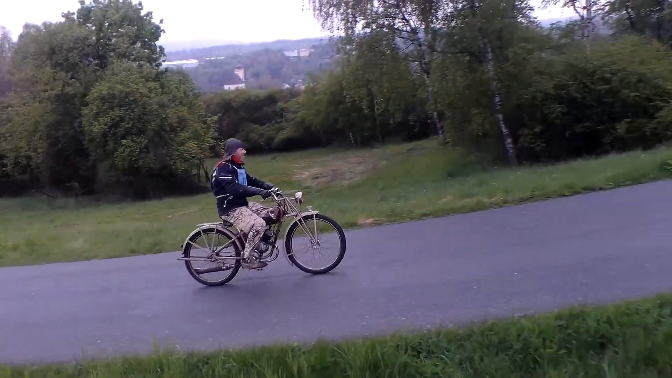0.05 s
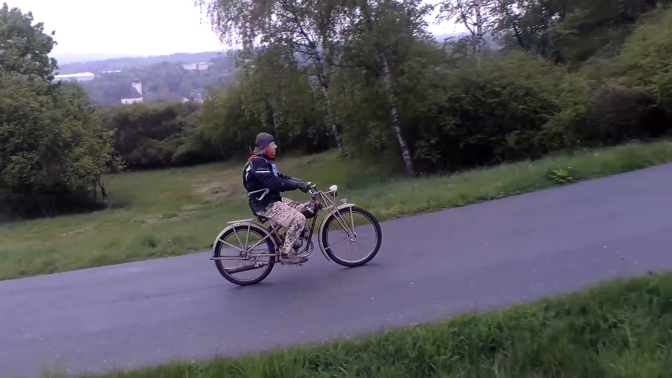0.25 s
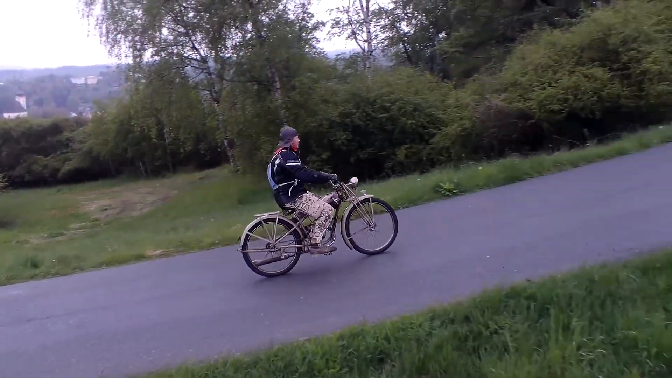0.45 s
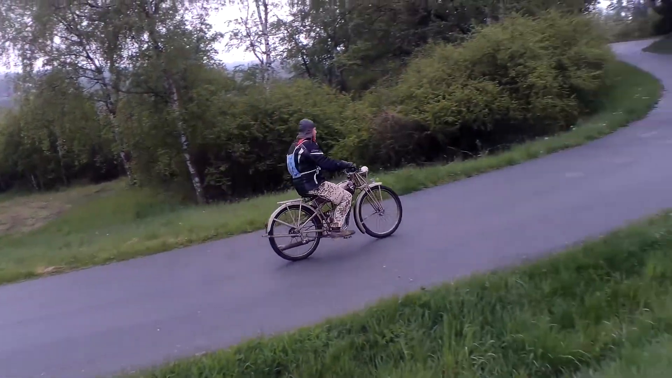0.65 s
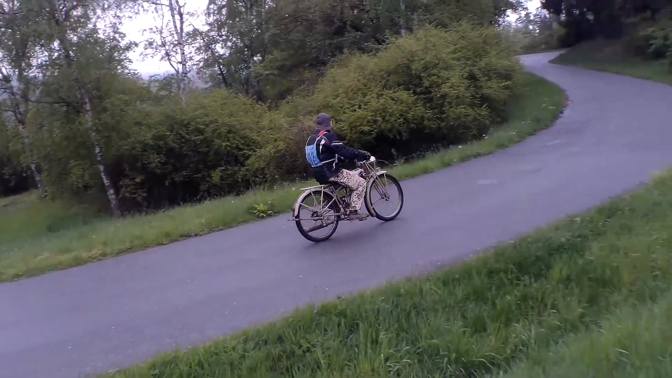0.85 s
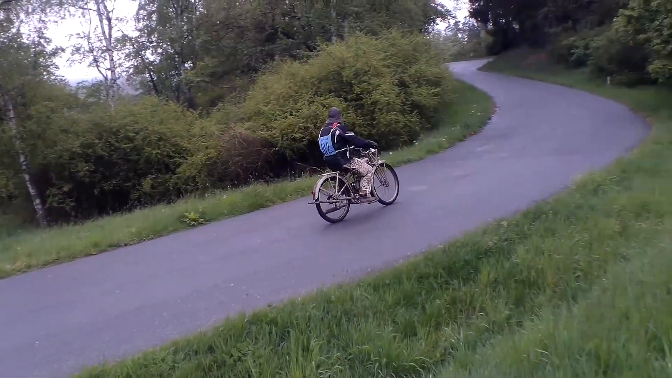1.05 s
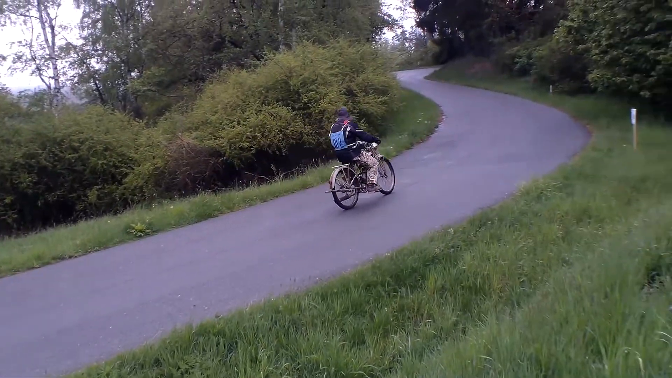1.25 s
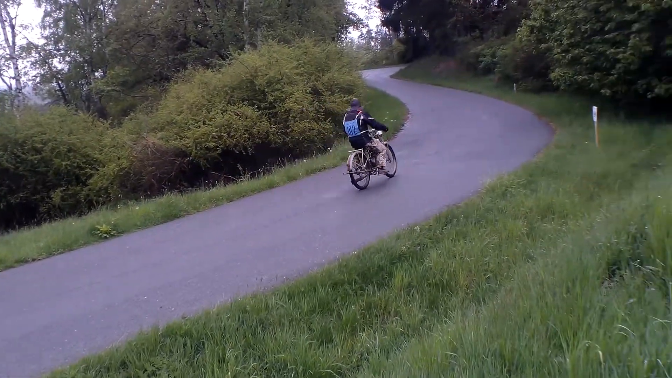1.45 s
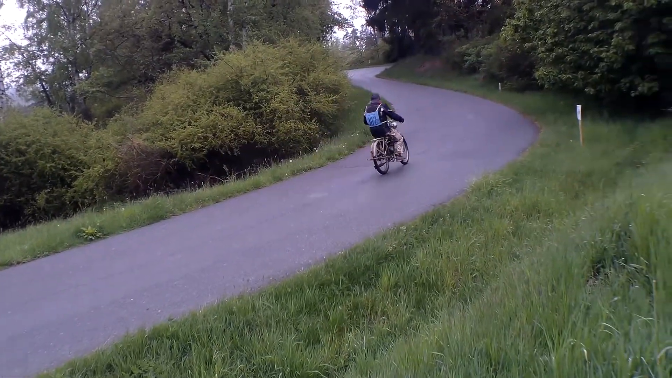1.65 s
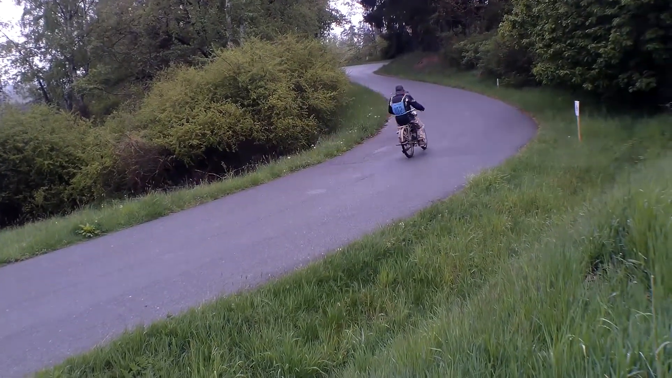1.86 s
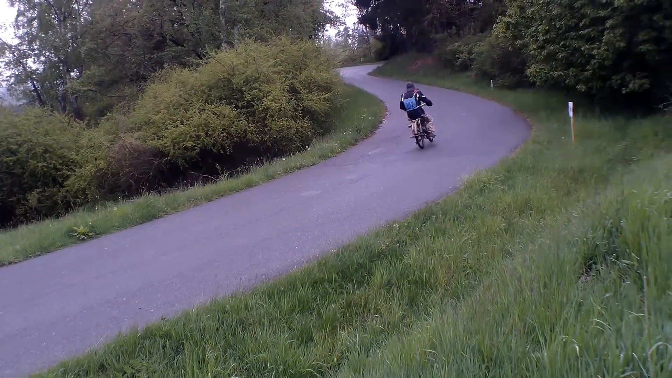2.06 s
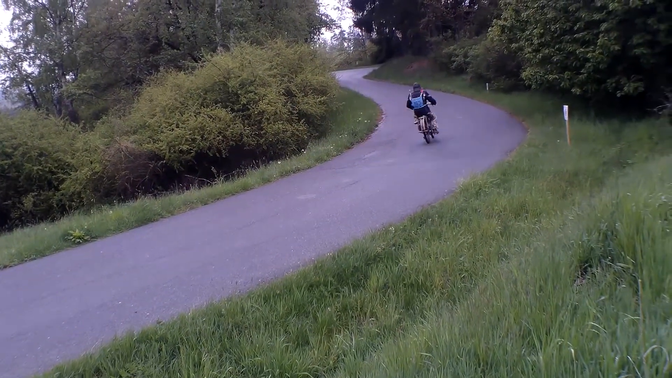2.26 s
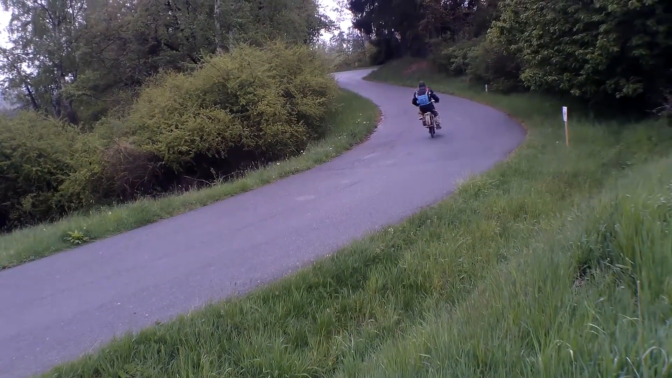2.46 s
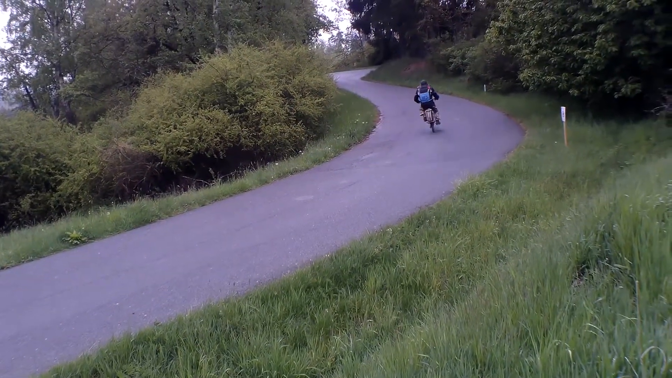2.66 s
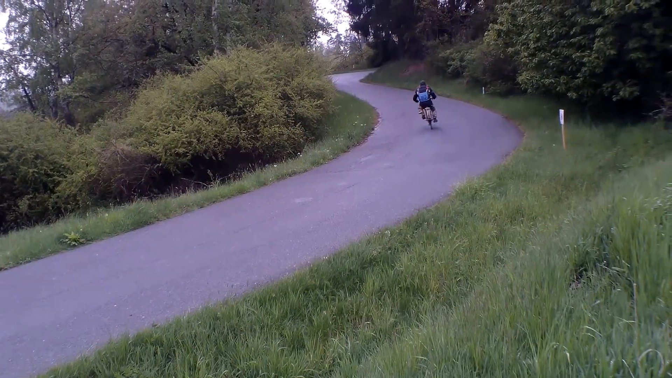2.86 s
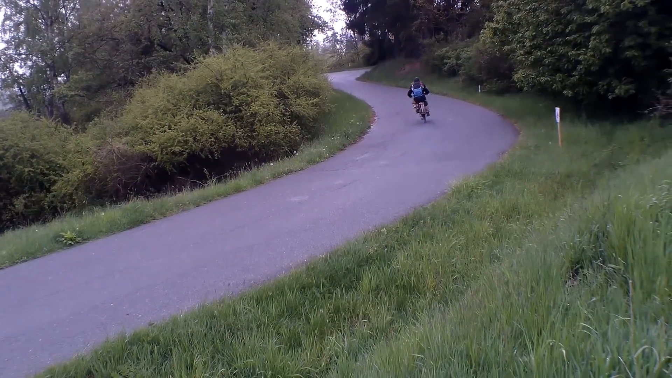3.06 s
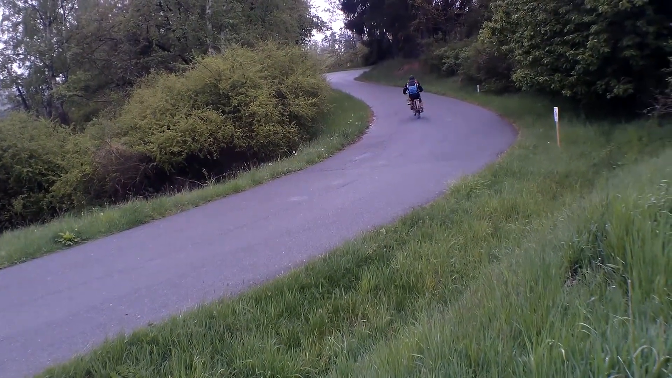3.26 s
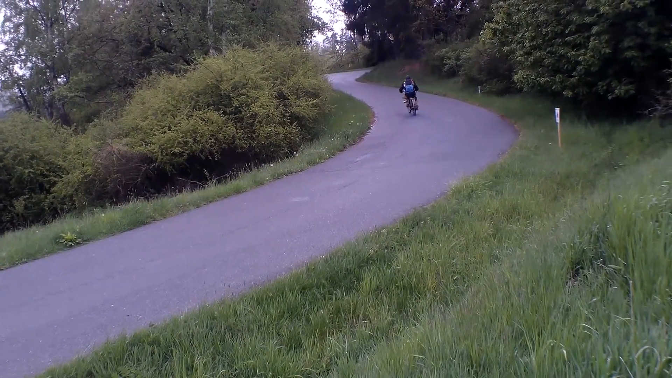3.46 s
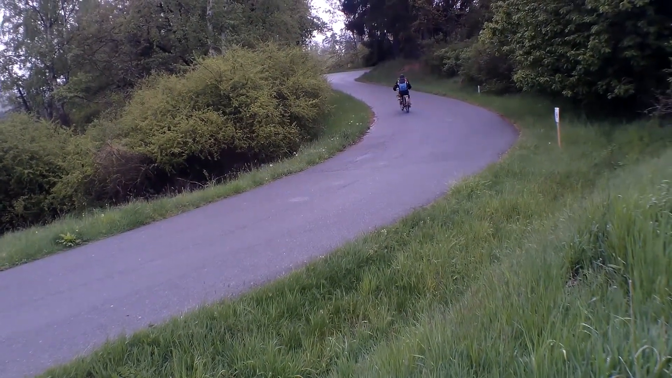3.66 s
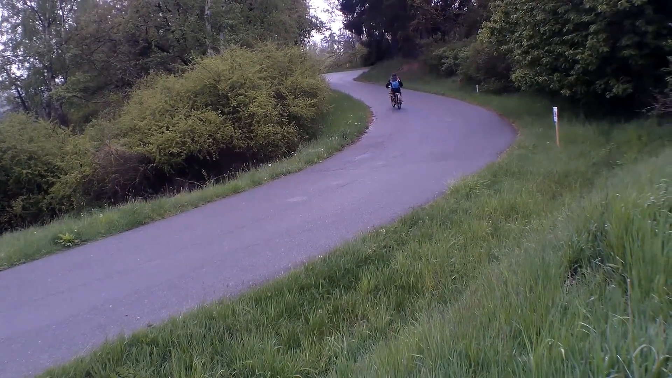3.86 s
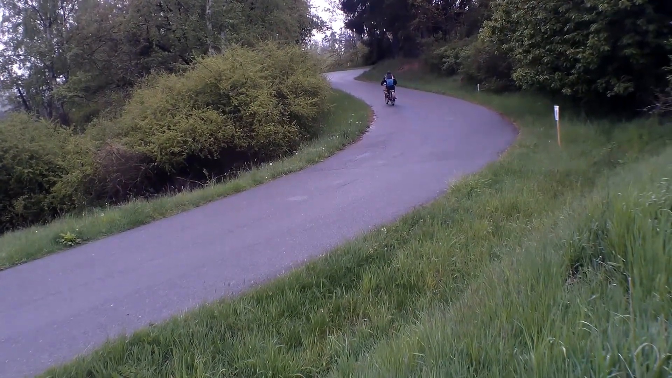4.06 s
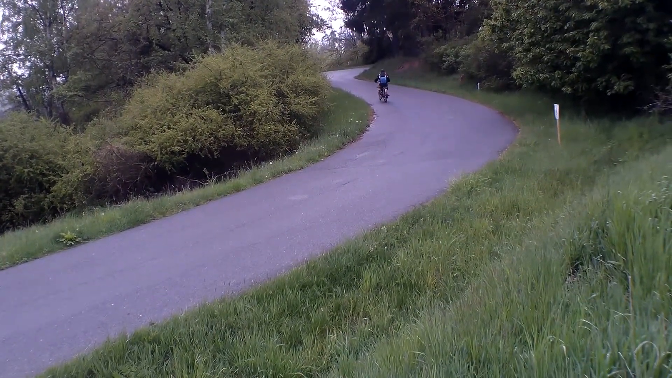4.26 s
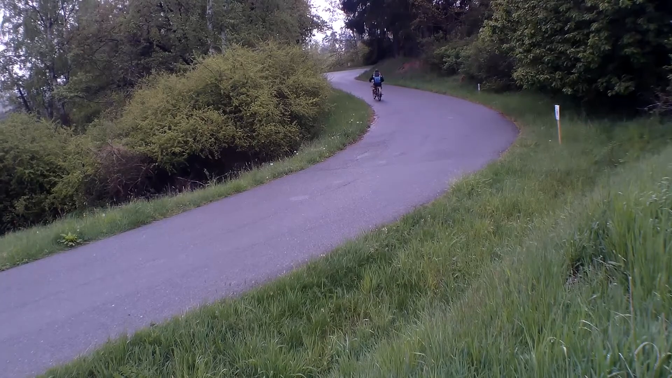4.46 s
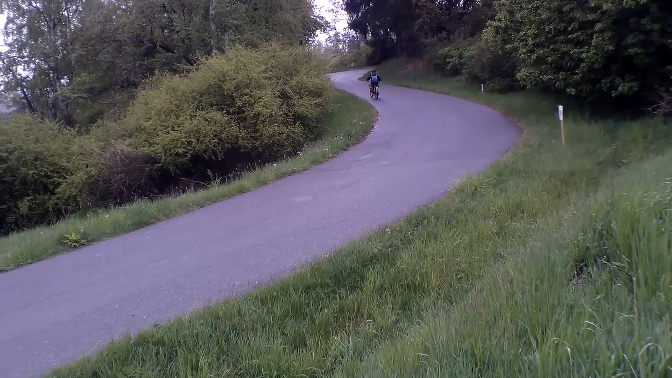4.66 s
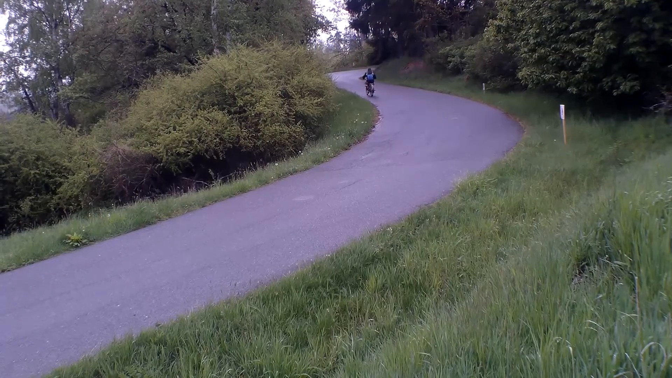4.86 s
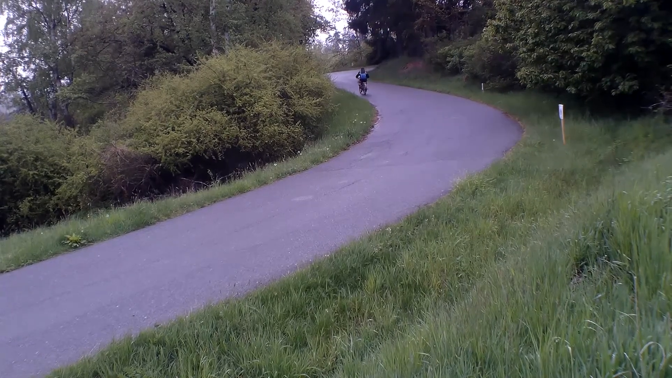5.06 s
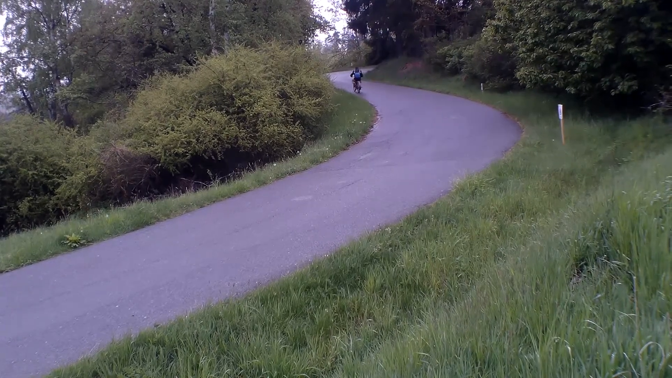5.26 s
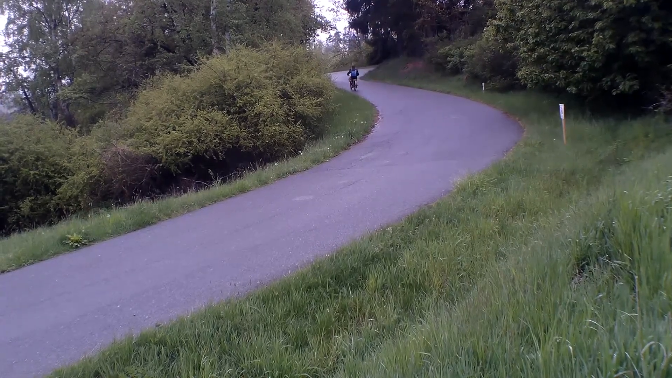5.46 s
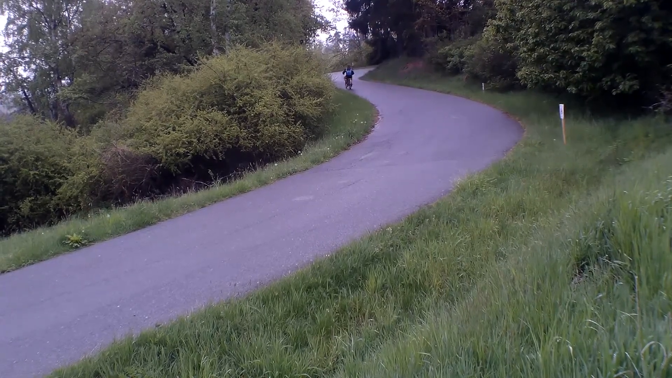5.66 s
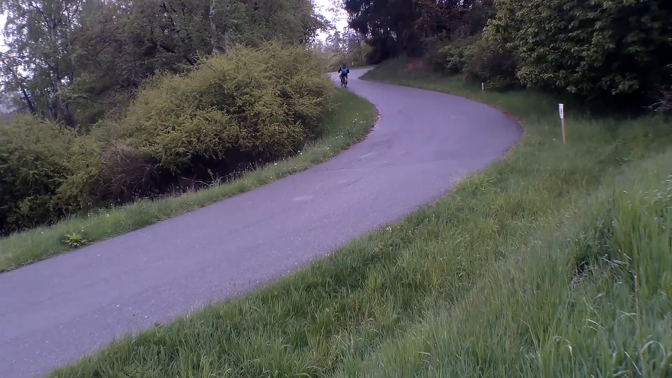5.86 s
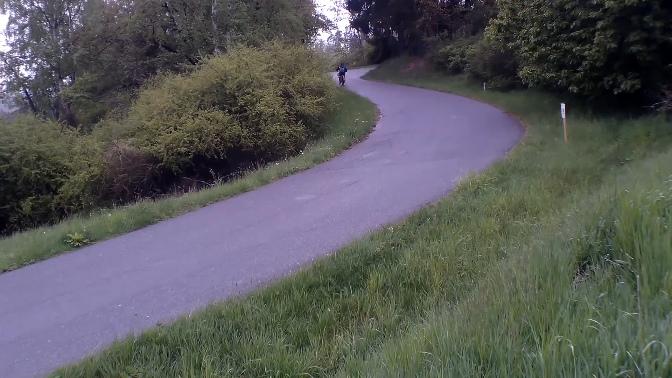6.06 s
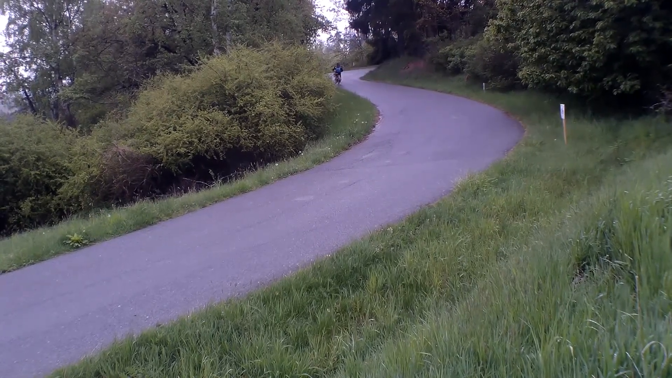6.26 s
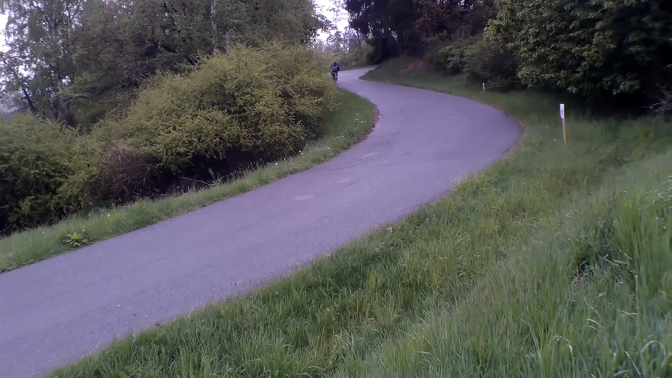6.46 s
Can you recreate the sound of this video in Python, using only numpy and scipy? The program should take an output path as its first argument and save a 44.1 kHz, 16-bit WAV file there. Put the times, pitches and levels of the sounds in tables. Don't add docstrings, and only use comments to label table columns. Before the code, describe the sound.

From 0 s a small two-stroke motorcycle is already close: a hard, fast buzz of about 65 firings a second, with clattering metal, raspy gas and bright chain sizzle. It is nearest around 0.5 s, the pitch easing down slightly as it passes. Crisp grit ticks cluster in the first two seconds, then become sparse. By 1.5-2 s the chain is gone and the bike is riding away round a bend, its tailpipe now facing the microphone, giving a nasal, droning buzz with small speed flutters. Short, very high cricket chirps recur about every half second throughout. Around 3.8 s the exhaust hardens briefly; near 4 s hiss and rattle drop behind bushes, and a twig snaps softly at 4.1 s. The buzz grows duller, dips again at about 5.6 s behind the crest, and remains faint at 6.5 s over quiet country hush, with only slight, dull hillside echoes.

```python
import sys
import numpy as np
from scipy import signal
from scipy.fft import rfft, irfft
from scipy.io import wavfile
from scipy.ndimage import uniform_filter1d, map_coordinates

SR = 44100
rng = np.random.default_rng(int(sys.argv[2]) if len(sys.argv) > 2 else 0)


def natural_amplitude(level_db):
    exponent = np.asarray(level_db, float) / 20
    return 10 ** exponent


def to_wav(sig):
    pcm = np.clip(np.atleast_2d(sig), -1, 1) * 32767
    pcm = np.round(pcm).astype(np.int16)
    wavfile.write(sys.argv[1], SR, pcm.T)


N = 287532
TIME_S = np.arange(N) / SR


def rms_one(x):
    return x / np.sqrt(np.mean(x ** 2) + 1e-20)


def in_time(rows):
    s, *columns = np.transpose(rows)
    return [np.interp(TIME_S, s, c) for c in columns]


def bell(at_s, for_s):
    return np.exp(-((TIME_S - at_s) / for_s) ** 2)


def hidden(at_s, over_s):
    return (1 + np.tanh((TIME_S - at_s) / over_s)) / 2


def drift(rate_hz, step=1):
    r = np.exp(-80 * np.pi * rate_hz / SR)
    slow = signal.lfilter([1], [1, -2 * r, r * r], rng.standard_normal(N // 40 + 2002))[2000:]
    return np.interp(np.arange(0, N, step) / 40, np.arange(len(slow)), rms_one(slow))


def resonate(x, hz, width_hz):
    r = np.exp(-np.pi * width_hz / SR)
    zeros = np.array([1, 0, -1]) * (1 - r * r) / 2
    poles = [1, -2 * r * np.cos(2 * np.pi * hz / SR), r * r]
    return signal.lfilter(zeros, poles, x + 1e-18)


def resonate_twice(x, hz, width_hz):
    return resonate(resonate(x, hz, width_hz), hz, width_hz)


def coloured(spectrum, source=None):
    hz, db = np.transpose(spectrum)
    white = rfft(rng.standard_normal(N) if source is None else source)
    bin_hz = np.arange(len(white)) * SR / N
    return rms_one(irfft(white * natural_amplitude(np.interp(np.log(bin_hz + 1), np.log(hz), db)), N))


def gate(turns, at_turn, sharp):
    return np.exp(sharp * (np.cos(2 * np.pi * (turns - at_turn)) - 1))


# freq_hz, density_db
HUSH_SPECTRUM = [(15, -48), (25, -8), (144, -7.5), (262, -4.5), (399, -6.5), (446, -3), (521, 2),
                 (1040, -11), (1480, -7), (1590, -1), (1720, -6), (4100, -13.5), (4800, -30), (6500, -52),
                 (11000, -120)]
# freq_hz, density_db
MIC_SPECTRUM = [(6350, -33), (10800, -25), (11700, 5), (12700, 7), (14500, 8), (15600, -10)]


def hush():
    murmur = natural_amplitude(-55.5 + 1.0 * drift(0.36)) * coloured(HUSH_SPECTRUM)
    return murmur + natural_amplitude(-80.0) * coloured(MIC_SPECTRUM)


# start_s, level_db, syllables, low_answer_db
CRICKET_CHIRPS = [(0.502, -45.5, 4, -1), (0.661, -59, 5, -10), (1.631, -52, 4, -10), (1.25, -49.5, 4, -6),
                  (1.76, -47, 4, -14), (2.125, -53.5, 4, -20), (2.47, -53.5, 4, -12), (2.858, -52, 5, -20),
                  (3.32, -51, 4, -2), (3.735, -51.5, 5, -10), (4.135, -51, 4, -3), (4.634, -51.5, 4, -12),
                  (4.886, -50, 5, -2), (5.385, -51, 4, -1), (5.886, -55, 4, -3), (6.235, -52.5, 3, -11)]


def cricket():
    out, t = np.zeros(N), np.arange(440) / SR
    shape = np.sin(np.pi * t / t[-1]) ** 0.6
    for start_s, level_db, strokes, low_db in CRICKET_CHIRPS:
        for k in range(strokes):
            luck = rng.standard_normal(4)
            last = k == strokes - 1
            fall_hz_per_s = 28000.0 * (1 + 2.5 * last)
            answer_db = level_db + low_db - 10 * (k % 2) - 9. * last
            for lag_s, pitch_hz, db in ((0, 10140, level_db), (.007, 8680, answer_db)):
                grain = 1 + .5 * np.sin(2 * np.pi * (190.0 + 50.0 * luck[1]) * t + 3 * luck[3])
                cycles = (pitch_hz + 89.0 * luck[0]) * t - fall_hz_per_s * t * t / 2
                stroke = shape * grain * np.sin(2 * np.pi * cycles)
                i = round((start_s - .003 + .016 * k + lag_s + 0.00098 * luck[1]) * SR)
                out[i:i + 440] += natural_amplitude(db + 0.5 + 1.0 * luck[2]) * stroke
    return out


# start_s, peak_db, centre_hz
GRIT_TICKS = [(0.0348, -13, 10000), (0.099, -13, 9800), (0.379, -25, 9820), (0.5367, -38, 8540),
              (0.6634, -15, 9300), (0.824, -9.5, 9600), (0.886, -12.5, 9550), (0.9024, -16, 9900),
              (1.439, -15.5, 9700), (1.7817, -12.5, 9300), (1.8442, -23, 10200), (2.7242, -20, 9800),
              (2.784, -22, 7440), (3.318, -21, 9600), (3.4986, -23, 9360), (3.6481, -29, 9970),
              (4.561, -28, 9700), (6.0395, -43, 10000), (6.368, -39, 8670)]
# start_s, peak_db
TWIG_SNAP = [
    (4.115, -28),
]


def ticks():
    out, t = np.zeros(N), np.arange(600) / SR
    for start_s, peak_db, centre_hz in GRIT_TICKS:
        decay = np.exp(-t / 0.00073) + 0.3 * np.exp(-t / 0.0055)
        noise = rng.standard_normal(600) * decay * np.tanh(t / 0.0005)
        burst = resonate_twice(noise, centre_hz, 2100.0)
        burst = burst + 0.35 * resonate(noise, 7700.0, 4000.)
        burst = burst + 0.19 * resonate_twice(noise, 12800.0, 1500.)
        out[round(start_s * SR):][:600] += natural_amplitude(peak_db - 15.0) * burst / np.abs(burst).max()
    for start_s, peak_db in TWIG_SNAP:
        crack = (1 + .4 * rng.standard_normal(600)) * np.exp(-t / 0.00004)
        noise = crack + .12 * rng.standard_normal(600) * np.exp(-t / .0007)
        burst = resonate_twice(noise, 4400.0, 1900.) - 0.99 * resonate_twice(noise, 6700.0, 2000.)
        out[round(start_s * SR):][:600] += natural_amplitude(peak_db + 2.5) * burst / np.abs(burst).max()
    return out


# at_s, extra_firings_hz
WHEEL_SURGES = [(0.23, .53), (0.536, 1.01), (0.841, 0.84), (1.499, 0.47), (1.931, 1.53), (2.428, 1.29),
                (2.744, 1.55), (4.267, 0.99), (4.552, 0.68), (5.169, 1.04), (5.512, 0.81), (6.073, 1.05),
                (6.367, 1.13)]


def racing():
    return sum(extra_hz * bell(at_s, .07) for at_s, extra_hz in WHEEL_SURGES)


# at_s, aim (0 aside - 1 straight at us)
PIPE_AIM = [(0, 0.086), (.25, -0.0062), (.45, -0.18), (.65, -0.25), (.98, -0.2), (1.5, -0.0057),
            (2.27, 0.31), (3.0, 0.65), (3.7, 1), (4.3, 1.25)]
# near_db, aim_gain_db, hedge_loss_db, hidden_at_s, hidden_over_s
ENGINE_LAYERS = [
    (-39.5, 2, -1, 2.2, .4),
    (-37, 14.5, 12.5, 4.57, 0.8),
    (-39, 10, 17.5, 4.57, 0.73),
    (-32, 4, 10.5, 4.01, 0.11),
    (-41.5, 3.5, 4.5, 3.81, 0.049),
]


def levels(extra_hz):
    aim = in_time(PIPE_AIM)[0]
    passes = ((0.62, 0.53), (0.44, 0.65))
    pipe_db, block_db = (-10 * np.log10(1 + ((TIME_S - s) / ride_s) ** 2) for s, ride_s in passes)
    shared_db = -0.04 * extra_hz - 2.5 * hidden(5.63, 0.025)
    rows = []
    for layer, spread_db in zip(ENGINE_LAYERS, 3 * [pipe_db] + 2 * [block_db]):
        near_db, aim_db, hedge_db, hidden_s, over_s = layer
        rows.append(near_db + spread_db + aim_db * aim - hedge_db * hidden(hidden_s, over_s) + shared_db)
    return np.array(rows)


# at_s, for_s, level_db
CHAIN_SIZZLE = [(.06, 0.12, -50), (.3, 0.15, -49), (.48, .06, -52), (.7, 0.11, -51), (.92, 0.11, -53),
                (1.15, 0.14, -57), (1.65, 0.076, -56), (1.85, .08, -61)]


def chain():
    spells = sum(natural_amplitude(level_db) * bell(at_s, for_s) for at_s, for_s, level_db in CHAIN_SIZZLE)
    sizzle = rms_one(resonate_twice(rng.standard_normal(N), 10100.0, 1400.0))
    return spells * natural_amplitude(2.0 * drift(40.0)) * sizzle


# freq_hz, density_db
HISS_SPECTRUM = [(250, -3), (1200, 0.5), (2530, 8), (4300, 2.5), (4640, -7), (5660, -1.5), (6200, -2.5),
                 (8340, -1), (9000, -3.5), (10200, 0), (11000, -6), (11800, -15.5), (13600, -18.5),
                 (14500, -12), (15600, -13.5)]
# freq_hz, width_hz, level_db
HISS_RINGS = [(3896, 87, -13), (4840, 32, -22), (5683, 38, -20), (8300, 260, -16.5), (9900, 120, -20.5),
              (13500, 80, -26)]


def gas_hiss(turns, hiss_db):
    hiss = rms_one(coloured(HISS_SPECTRUM) * (1.34 + gate(turns, 0.61, 3.5)))
    rings = sum(natural_amplitude(level_db) * rms_one(resonate(rng.standard_normal(N), freq_hz, width_hz))
                for freq_hz, width_hz, level_db in HISS_RINGS)
    return natural_amplitude(hiss_db + 1.14 * drift(12.0)) * hiss + natural_amplitude(hiss_db) * rings


def puff(turns, pipe_db):
    gas = resonate(resonate(rng.standard_normal(N), 900.0, 670.0), 904.0, 680.0)
    return natural_amplitude(pipe_db - 25) * rms_one(gas) * (4.76 + gate(turns, 0.62, 0.16))


# at_s, level_db
PIPE_POPS = [(3.8, -41), (3.1, -47), (3.8, -46), (1.93, -49), (.86, -55)]


def pops(turns):
    spells = sum(natural_amplitude(level_db) * bell(at_s, 0.015) for at_s, level_db in PIPE_POPS)
    firing = np.diff(np.floor(turns), prepend=0.)
    return spells * rms_one(resonate_twice(firing, 986, 280))


def repeating(turns):
    age = TIME_S / .2
    patterns = rng.standard_normal((int(age[-1]) + 2, 701))
    melt = age % 1
    noise = map_coordinates(patterns, [age, turns % 1 * 700], order=1)
    return rms_one(noise / np.hypot(melt, 1 - melt))


# freq_hz, density_db
RASP_SPECTRUM = [(900, -39), (1350, -3), (1550, 9.5), (1890, 2), (2070, 3.5), (3200, -3.5), (4200, -9.5),
                 (4700, -26.5), (6500, -17), (11000, -120)]


def port_rasp(turns, ahead):
    repeat_share = .86
    gas = np.sqrt(repeat_share) * repeating(turns) + np.sqrt(1 - repeat_share) * rng.standard_normal(N)
    return coloured(RASP_SPECTRUM, gas * (.4 + gate(turns + ahead / 2, 0, 1.8)))


# freq_hz, width_hz, level_db, best_s, for_s
FIN_MODES = [(2897, 49, 0, 0.13, 0.18), (2826, 20, -5.5, 0.35, 0.58), (3970, 130, -9, 4.9, 0.46),
             (4900, 51, -12.5, 0.1, 0.16), (2310, 83, -2, 0.22, 0.078), (1545, 33, -2, 0.32, 0.1),
             (1674, 67, -9, 0.099, 0.23), (1810, 41, -5, 0.41, 0.53), (1668, 64, -5.5, 0.61, 0.33),
             (2620, 81, -8, 0.77, 0.74), (1996, 9, -2, 0.48, 0.25), (2010, 46, -2, 0.95, 0.16),
             (2044, 47, -5, 1.2, 0.35), (2020, 61, -4, 1.52, 0.39), (4070, 150, -5.5, 0.29, 0.26),
             (3960, 74, -5.5, 0.61, 0.19), (3800, 39, -7.5, 0.96, 0.17), (3760, 380, -4, 1.236, 0.16),
             (3910, 71, -9, 1.8, 0.17), (3620, 45, -9.5, 0.21, 1.1), (3560, 32, -8.5, 1.62, 0.25),
             (1520, 47, -8, 1.3, 0.12), (1770, 33, -7.5, 1.3, 0.38), (1683, 60, -10, 0.88, 0.067),
             (1555, 60, -3.5, 0.69, 0.074), (1645, 34, -8, 1.8, 0.53), (3027, 34, -9, 1.5, 0.42),
             (3950, 150, -3.5, 2.28, 0.16), (3070, 70, -6.5, 2.44, 0.22), (3190, 120, -8, 2.16, 0.92),
             (3576, 110, -7.5, 2.94, 0.64), (1554, 98, 0, 2.45, 0.38), (1523, 49, 2, 2.97, 0.19),
             (1550, 41, 2, 4.01, 0.5), (2062, 50, -2.5, 3.9, 0.94), (2540, 120, -8.5, 3.46, 0.45),
             (3260, 66, -6, 3.57, 0.42), (3820, 48, -7, 3.45, 0.068), (2185, 31, -6, 3.54, 0.34),
             (1630, 60, 3, 4.1, 0.31), (1586, 33, -3.5, 6.8, 1.8), (2040, 24, -14, 4.5, 0.26),
             (2080, 38, -4, 6.2, 0.66)]


def rattle(turns, ahead):
    loose = turns + .003 * drift(25.0)
    scrape = .26 * gate(turns + ahead, .1, 1.5) * rng.standard_normal(N)
    soft = signal.butter(4, 4300, fs=SR, output="sos")
    blows = []
    for early in (.1, ahead + .17, ahead + .08):
        at = np.flatnonzero(np.diff(np.floor(loose + early)) > 0)
        knocks = np.full(N, 1e-12)
        knocks[at] = 30.0 * natural_amplitude(1.5 * rng.standard_normal(len(at)))
        blows.append(signal.sosfilt(soft, knocks) + scrape)
    ringing, power = np.zeros((2, N))
    for freq_hz, width_hz, level_db, best_s, for_s in FIN_MODES:
        near = np.abs(TIME_S - best_s) < 2.5 * for_s
        facing = natural_amplitude(level_db) * bell(best_s, for_s)[near]
        blow = blows[(freq_hz > 1900) + (freq_hz > 2300)][near]
        swelling = resonate(blow, freq_hz, 380)
        ringing[near] += facing * rms_one(resonate(swelling, freq_hz, width_hz))
        power[near] += facing ** 2
    rasp_gain = natural_amplitude(-2.0)
    rasp = rasp_gain * natural_amplitude(1.0 * drift(7.8)) * port_rasp(turns, ahead)
    return (ringing + rasp) / np.sqrt(power + rasp_gain ** 2)


# at_s, share
INTAKE_SHARE = [(0, .7), (.6, .6), (1.1, .3), (1.7, .4), (2.5, .85), (4.5, .9)]
# order, level_db
ORDERS_ABREAST = [(1, -19), (2, -9), (3, -14), (4, -6.5), (5, -18), (6, -21), (7, 0.5), (8, 1), (9, 8.5),
                  (10, -6), (11, -2), (12, -4), (13, -6), (14, 0), (15, -6), (16, -3.5), (17, -3),
                  (18, -11), (19, -14), (20, -7), (21, -12), (22, -7)]
ORDERS_LEVEL = [(1, -13), (2, -8), (3, -2), (4, -5), (5, -10.5), (6, -18.5), (7, 11.5), (8, 8.5), (9, 4),
                (10, -2), (11, 8), (12, 0), (13, -11), (14, -5.5), (15, -13), (16, -4), (17, -4.5),
                (18, -6.5), (19, -11), (20, -12), (21, -8), (22, -8)]
ORDERS_PASSING = [(1, -10.5), (2, -10.5), (3, 3), (4, -22), (5, -5.5), (6, -7.5), (7, -4), (8, 5), (9, 9),
                  (10, 1), (11, -5), (12, 2.5), (13, -2), (14, -2), (15, -4), (16, -6), (17, 0), (18, -6),
                  (19, -13), (20, -15), (21, -11), (22, -16)]
ORDERS_GOING = [(1, -9.5), (2, -26), (3, 1), (4, -8.5), (5, -8), (6, -13), (7, 14.5), (8, 6.5), (9, -16),
                (10, 11), (11, 15), (12, -4), (13, -3), (14, -17), (15, -2), (16, -5), (17, -4.5), (18, -5),
                (19, -3), (20, -11), (21, -21), (22, -4)]
ORDERS_QUARTER = [(1, -14), (2, -30), (3, -6), (4, -8), (5, -17), (6, -26), (7, 4.5), (8, 2), (9, 0),
                  (10, -10), (11, -7), (12, 3), (13, -4), (14, 2.5), (15, -7), (16, 3.5), (17, -1.5),
                  (18, -2), (19, -9), (20, -24), (21, -9), (22, -14)]
ORDERS_LEAVING = [(1, -13.5), (2, -22), (3, -7), (4, -7.5), (5, -18), (6, -28), (7, -2.5), (8, -0.5),
                  (9, 0), (10, -3.5), (11, -26), (12, -2.5), (13, -8), (14, -6.5), (15, -17), (16, -8.5),
                  (17, -4.5), (18, -12), (19, -16), (20, -14), (21, -8), (22, -35)]
ORDERS_BEHIND = [(1, -17.5), (2, -24), (3, -10.5), (4, -8), (5, -17), (6, -28), (7, -5), (8, -0.5),
                 (9, -0.5), (10, -2), (11, -9), (12, -3), (13, -3), (14, -4), (15, -11), (16, -12),
                 (17, -3.5), (18, -8), (19, -15), (20, -8.5), (21, -11), (22, -29)]
ORDERS_FAR = [(1, -17), (2, -20), (3, -10), (4, -8), (5, -18.5), (6, -25), (7, -4), (8, -0.5), (9, -3),
              (10, -4.5), (11, -11.5), (12, -8.5), (13, -9), (14, -13), (15, -12.5), (16, -17), (17, -14.5),
              (18, -21), (19, -24), (20, -17.5), (21, -48), (22, -50)]


def exhaust(turns, ahead, view, group_db, flutter_db, uneven_db, step=6):
    sides = np.array([ORDERS_ABREAST, ORDERS_LEVEL, ORDERS_PASSING, ORDERS_GOING,
                      ORDERS_QUARTER, ORDERS_LEAVING, ORDERS_BEHIND, ORDERS_FAR])
    turns, ahead, view, group_db = turns[::step], ahead[::step], view[::step], group_db[:, ::step]
    sweep_turns, sweep_orders, fall_turns = .3, 3.5, .07
    count = int(turns[-1]) + 2
    intake = np.clip(in_time(INTAKE_SHARE)[0][::step], 0, .95)
    strength = np.interp(turns, np.arange(count) + .5, rng.standard_normal(count))
    groups, power = np.zeros((2, 3, len(turns)))
    for k in range(1, sides.shape[1] + 1):
        level = natural_amplitude(np.interp(view, np.arange(len(sides)), sides[:, k - 1, 1]))
        flutter = flutter_db * np.sqrt(k / 10) * drift(2.3, step=step)
        wobble = natural_amplitude(flutter + uneven_db * np.tanh(k / 6) * strength)
        lead = np.angle(1 + intake * np.exp(2j * np.pi * ahead * k))
        edge = -1.8 + 1.4 / k ** 2 - 2 * np.pi * sweep_turns * sweep_orders * np.exp(-k / sweep_orders)
        from_behind = np.clip(.65 * (view - 4), 0, 1)
        fall = np.pi * fall_turns * from_behind * (np.clip(k - 9, -3, 3) ** 2 - 9)
        smear = .006 * k * drift(7.0, step=step)
        group = (k > 6) + (k > 11)
        phase = 2 * np.pi * k * turns + edge + fall + lead + smear
        groups[group] += level * wobble * np.sqrt(2) * np.cos(phase)
        power[group] += level ** 2
    pulse = np.sum(groups / np.sqrt(power) * natural_amplitude(group_db), axis=0)
    return signal.resample_poly(pulse, step, 1)[:N]


def hillside(x, wet_db):
    out = x.copy()
    dull = signal.sosfilt(signal.butter(1, 2500., fs=SR, output="sos"), x)
    for lag_s, level_db in ((.0235, -0.5), (.041, -3), (.067, -33), (.109, -9)):
        lag = round(lag_s * SR)
        out[lag:] += natural_amplitude(wet_db + level_db) * dull[:-lag]
    return out


# at_s, view (0 abreast - 7 far uphill)
VIEW_PATH = [(.12, 0), (.47, 1), (.83, 2), (1.18, 3), (1.65, 4), (2.4, 5), (3.3, 6), (4.5, 7)]
# at_s, lead_turns
BLOCK_LEAD = [(0, .445), (.2, .44), (.35, .41), (.55, .368), (.8, .327), (1.2, .278), (1.55, .25),
              (2.2, .227), (3.8, .22)]
# at_s, firings_hz
CRUISE_SPEED = [(0.0, 64.59), (0.4, 63.24), (1.1, 61.88), (1.75, 62.31), (2.2, 62.6), (3.0, 64.1),
                (3.8, 65.29), (4.1, 64.64), (4.4, 65.77), (5.0, 65.56), (5.4, 65.9), (6.52, 65.07)]


def motorcycle():
    extra_hz = racing()
    *group_db, rattle_db, hiss_db = levels(extra_hz)
    group_db = np.array(group_db)
    view, ahead = in_time(VIEW_PATH)[0], in_time(BLOCK_LEAD)[0]
    turns = np.cumsum(in_time(CRUISE_SPEED)[0] + extra_hz) / SR + .2
    pipe = exhaust(turns, ahead, view, group_db, flutter_db=.85, uneven_db=.5)
    shade_db = 3 * bell(2.21, 0.27)
    body = natural_amplitude(rattle_db - 5.5 - shade_db) * rattle(turns, ahead)
    loose_gas = puff(turns, group_db[1:].mean(axis=0))
    return hillside(pipe + body + loose_gas + pops(turns), wet_db=-30.5) + gas_hiss(turns, hiss_db)


def scene():
    return (hush() + cricket() + ticks() + chain() + motorcycle())[None]


def thin_top(x, margin_db, slope_db, chance):
    hz, s, frames = signal.stft(x, SR, nperseg=2048)
    masker_db = 10 * np.log10(np.mean(np.abs(frames[430:490]) ** 2, axis=0) + 1e-20)
    for low in range(512, 736, 8):
        band_db = 10 * np.log10(np.mean(np.abs(frames[low:low + 8]) ** 2, axis=0) + 1e-20)
        luck = uniform_filter1d(rng.standard_normal(len(s)), size=3) * np.sqrt(3)
        masked = band_db < masker_db - margin_db - slope_db * abs(hz[low] - 11750) / 1000
        frames[low:low + 8] *= np.where(masked | (luck > chance), .03, 1)
    return signal.istft(frames, SR, nperseg=2048)[1][:N]


def low_pass(x):
    return signal.sosfilt(signal.butter(12, 15740, fs=SR, output="sos"), x)


def record(dry):
    dry = signal.sosfilt(signal.cheby2(12, 60, 16050, fs=SR, output="sos"), dry)
    dry = thin_top(dry[0], margin_db=13.5, slope_db=10, chance=.7)[None]
    starved = np.clip(np.minimum(TIME_S - 4.086, 4.147 - TIME_S) * 500, 0, 1)
    low = signal.sosfiltfilt(signal.cheby2(12, 32, 9000, fs=SR, output="sos"), dry)
    return low_pass(dry + starved * (low - dry))


dry = scene()
out = record(dry)
to_wav(out)
```